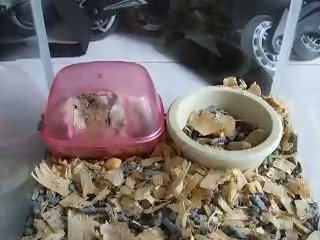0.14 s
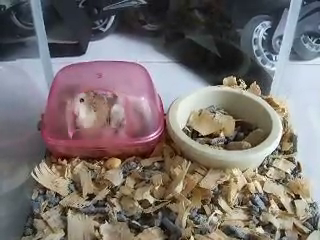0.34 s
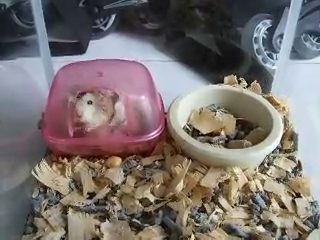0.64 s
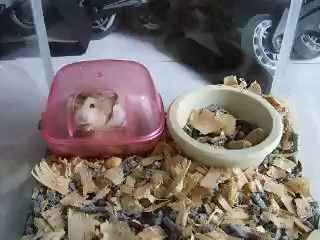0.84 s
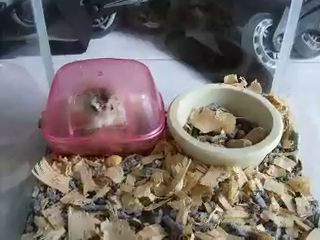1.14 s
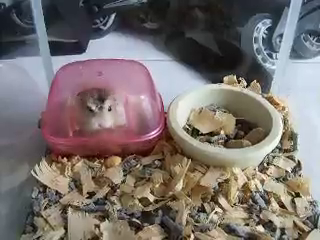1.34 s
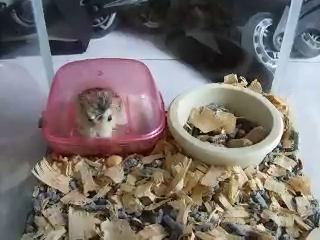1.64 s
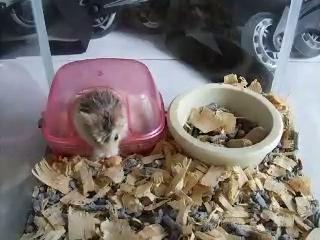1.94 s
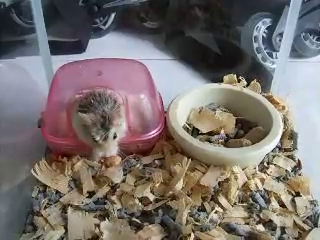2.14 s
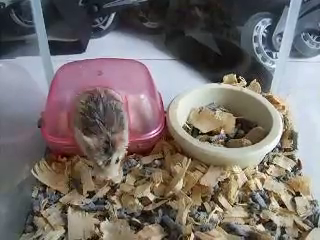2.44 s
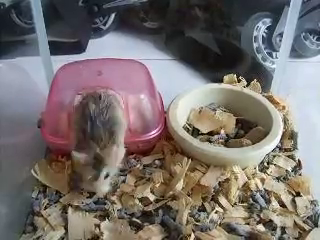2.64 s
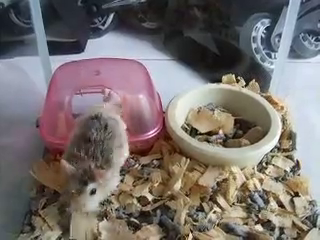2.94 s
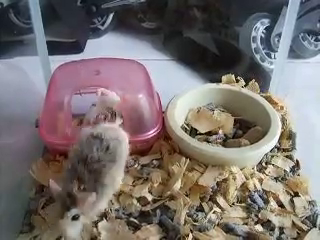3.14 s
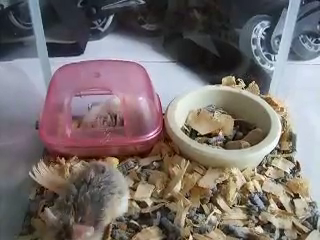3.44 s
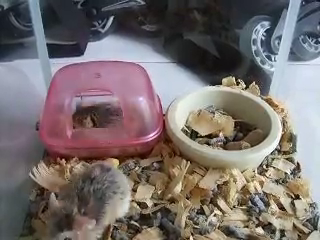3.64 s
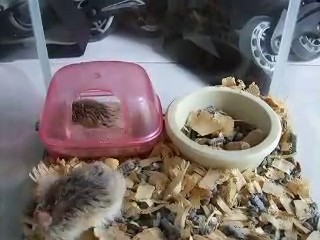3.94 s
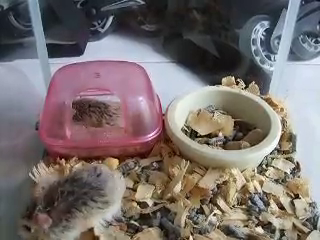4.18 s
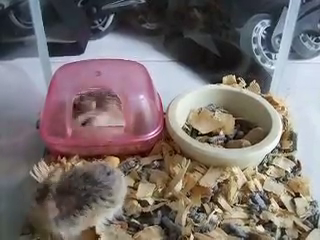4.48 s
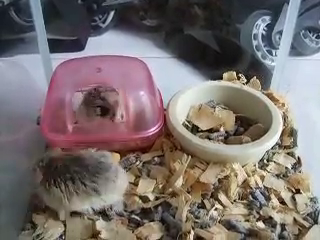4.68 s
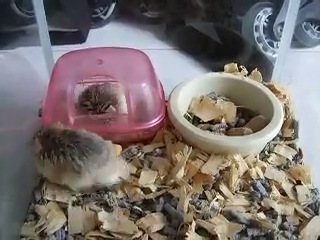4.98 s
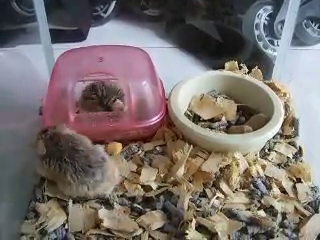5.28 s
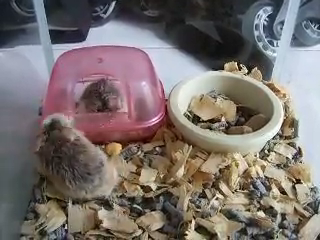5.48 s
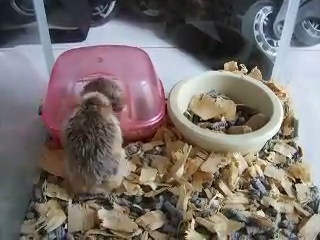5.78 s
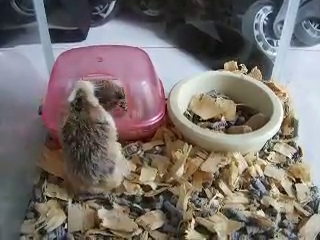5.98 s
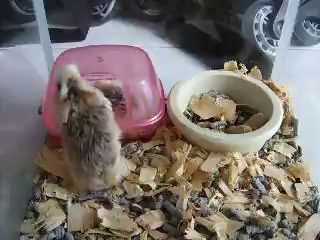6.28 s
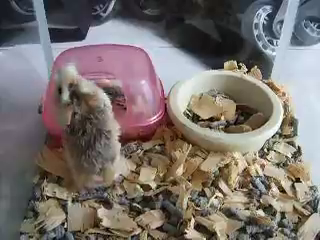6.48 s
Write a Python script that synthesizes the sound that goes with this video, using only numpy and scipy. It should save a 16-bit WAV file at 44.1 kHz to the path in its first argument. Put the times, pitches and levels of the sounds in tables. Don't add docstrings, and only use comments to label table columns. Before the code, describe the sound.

Close to a cage in a hard-floored room, hamsters shuffle through dry shavings, snapping flakes and ticking claws on a plastic hideout. A sharper tick comes early, then the hollow shell knocks once. A steady fan and traffic hum wavers beneath; an engine pulls away faintly outside, and later a thin far horn blares and echoes. The small microphone hisses, with dull highest treble.

```python
import sys
import numpy as np
from scipy import signal
from scipy.fft import rfft, irfft
from scipy.io import wavfile
from scipy.ndimage import uniform_filter1d

SR = 44100
rng = np.random.default_rng(int(sys.argv[2]) if len(sys.argv) > 2 else 0)


def materialize(psi):
    bounded = np.clip(np.atleast_2d(psi).T, -1, 1)
    quanta = np.round(bounded * 32767).astype(np.int16)
    wavfile.write(sys.argv[1], SR, quanta)


def ratio(d):
    e = np.asarray(d, float) / 20
    return 10 ** e


N = 291716


def rms_one(x):
    return x / np.sqrt(np.mean(x ** 2) + 1e-20)


def drift(rate):
    r = np.exp(-80 * np.pi * rate / SR)
    white = rng.standard_normal(N // 40 + 2002)
    slow = signal.lfilter([1], [1, -2 * r, r * r], white)[2000:]
    return np.interp(np.arange(N) / 40, np.arange(len(slow)), rms_one(slow))


def coloured(x, spectrum):
    (low_hz, low_db), (high_hz, high_db) = spectrum[0], spectrum[-1]
    points = [(low_hz / 2, low_db - 30), *spectrum, (high_hz * 2, high_db - 30)]
    point_hz, point_db = np.transpose(points)
    hz = np.maximum(np.fft.rfftfreq(N, 1 / SR), 1)
    return irfft(rfft(x) * ratio(np.interp(np.log(hz), np.log(point_hz), point_db)), N)


def ring(clicks, hz, t60):
    r, w = ratio(-60 / (t60 * SR)), 2 * np.pi * hz / SR
    return signal.lfilter([0, np.sin(w)], [1, -2 * r * np.cos(w), r * r], clicks + 1e-18)


def hollow(hz, width_hz, even=0.063):
    t60 = np.log(1000) / (np.pi * width_hz)
    held_once = ring(rng.standard_normal(N + 9000), hz, t60)
    tone = rms_one(ring(held_once, hz, t60)[9000:])
    height = np.sqrt(uniform_filter1d(tone ** 2, round(3 * SR / hz)) + .05)
    return rms_one(tone / height ** even)


def grains(per_s, spread_db):
    size_db = spread_db * np.minimum(rng.exponential(1, N), 4)
    sizes = ratio(size_db) * rng.choice([-1, 1], N)
    return sizes * (rng.random(N) < per_s / SR)


def efforts(rows, rise_s, fall_s, rest_db):
    t, power = np.arange(0, N + 40, 40) / SR, 0
    for start_s, length_s, db in rows:
        rise = np.clip((t - start_s) / rise_s + 1, 0, 1)
        fall = np.exp(-np.maximum(t - start_s - length_s, 0) / fall_s)
        power = power + (ratio(db) * rise * fall) ** 2
    return 10 * np.log10(ratio(rest_db) ** 2 + np.interp(np.arange(N) / SR, t, power))


# pitch_hz, level_db (per Hz)
RUMBLE = [(15, -53), (34, -42.5), (45, -45.5), (90, -52), (130, -44.5), (190, -48), (300, -51.5),
          (340, -72), (430, -61), (600, -57), (830, -52), (1000, -55), (1300, -76), (1600, -68)]
# pitch_hz, width_hz, level_db
ROOM_RINGS = [(166.4, 7.4, -51), (188.3, 14, -53), (228.4, 17.4, -47.5), (314.3, 26, -55), (368, 30, -60),
              (716, 56, -58), (818, 134, -47), (918, 83, -49.5), (1188, 51, -62.5)]
# time_s, level_db
FAN = [(0, -38), (.42, -48), (.7, -40), (1.6, -43.5), (1.8, -38.5), (2.05, -44), (2.3, -39.5), (2.8, -43),
       (3.0, -41), (4.9, -40), (5.38, -35.5), (5.71, -42), (6.0, -37.5), (6.1, -39), (6.3, -41),
       (6.42, -33.5), (6.52, -37), (6.61, -43)]
# start_s, length_s, level_db
CATCHES = [
    (.6, 0.11, -48.5),
    (3.3, 0.54, -47.5),
    (4.4, 0.056, -45.5),
    (4.82, 0.069, -54.5),
    (5.18, 0.07, -49),
    (5.65, 0.31, -52.5),
]
OVERTONE_DB = -54
CATCH_RISE_S, CATCH_FALL_S = 0.11, 0.053
TRAFFIC_START_DB, TRAFFIC_NEARS_DB, TRAFFIC_NEARS_S = -2.5, 3.0, 3
LOW_WAVER_DB, MID_WAVER_DB, WAVER_PER_S = 0.44, 0.34, 7.5


def room_hum():
    t = np.arange(N) / SR
    fan_db = np.interp(t, *np.transpose(FAN))
    overtone_db = efforts(CATCHES, CATCH_RISE_S, CATCH_FALL_S, OVERTONE_DB)
    bed = 19.84 * coloured(rng.standard_normal(N), RUMBLE)
    bed = bed + sum(ratio(db) * hollow(hz, width) for hz, width, db in ROOM_RINGS)
    low = signal.sosfiltfilt(signal.butter(2, 450, fs=SR, output="sos"), bed)
    mid_db = TRAFFIC_START_DB + TRAFFIC_NEARS_DB * (1 - np.exp(-t / TRAFFIC_NEARS_S))
    wavering_low = low * ratio(LOW_WAVER_DB * drift(WAVER_PER_S))
    wavering_mid = (bed - low) * ratio(mid_db + MID_WAVER_DB * drift(WAVER_PER_S))
    fan = ratio(fan_db - 1.5) * hollow(270.1, 23.9, even=0.46)
    overtone = ratio(overtone_db - 1.5) * hollow(541.3, 21, even=0.13)
    return wavering_low + wavering_mid + fan + overtone


IDLE_HZ, IDLE_DB, PULL_HZ, PULL_DB = 124.2, -46.5, 134.8, -38
PULL_S, PULL_LASTS_S, SPIN_UP_S, GONE_S = .9, .73, 0.45, 0.18


def engine():
    t = np.arange(N) / SR
    hz = PULL_HZ - (PULL_HZ - IDLE_HZ) * np.exp(-np.maximum(t - PULL_S, 0) / SPIN_UP_S)
    idle_db = IDLE_DB - 200 * (t > PULL_S)
    db = efforts([(PULL_S, PULL_LASTS_S, PULL_DB)], 0.025, GONE_S, idle_db)
    return np.sqrt(2) * ratio(db - 1.0 + 0.15 * drift(2.9)) * np.sin(2 * np.pi * np.cumsum(hz) / SR)


# start_s, held_s, level_db (of the lead overtone)
BLASTS = [
    (3.916, 0.049, -41.5),
    (4.07, .06, -50.5),
    (4.2, .05, -65),
    (4.36, 0.071, -59),
]
# order (times the base pitch), level_db
HORN_ORDERS = [(6, -12), (7.93, 0), (8.95, -14)]
HORN_S, HORN_ENDS_S, HORN_START_HZ, HORN_HZ, HORN_SETTLES_S = 3.916, 5.4, 424, 432, .12
BLAST_RISE_S, BLAST_FALL_S = .004, 0.039
STREET_DB, STREET_LOSS_DB_PER_S = -58, 3.5
UPPER_DB, UPPER_LOSS_DB_PER_S, UPPER_RISE_S = -55.5, 6, .1


def horn():
    t = np.arange(N) / SR
    since = np.maximum(t - HORN_S, 0)
    hz = HORN_HZ - (HORN_HZ - HORN_START_HZ) * np.exp(-since / HORN_SETTLES_S)
    street_db = STREET_DB - STREET_LOSS_DB_PER_S * since
    lead_db = efforts(BLASTS, BLAST_RISE_S, BLAST_FALL_S, street_db)
    upper_db = UPPER_DB - UPPER_LOSS_DB_PER_S * since - 6.6 * np.exp(-since / UPPER_RISE_S)
    overtones = [(7.03, lead_db), (6.925, lead_db - 1 - 3 * since), (7.8, upper_db - 4)]
    overtones += [(order, upper_db + order_db) for order, order_db in HORN_ORDERS]
    out, wobble = 0, 1 + .002 * drift(30)
    for order, db in overtones:
        turns = order * np.cumsum(hz * (wobble + .0012 * drift(40))) / SR
        out = out + ratio(db + 2.5 * drift(25)) * np.sin(2 * np.pi * turns)
    onset = np.clip((t - HORN_S) / BLAST_RISE_S + 1, 0, 1)
    return onset * (t < HORN_ENDS_S) * out


# time_s, peak_db
KNOCKS = [
    (2.8356, -26.5),
    (2.8425, -59),
]
# pitch_hz, level_db, t60_s
KNOCK_MODES = [(557, 7, 0.039), (395, -25, 0.02), (695, -3, 0.025)]


def knock():
    clicks = np.zeros(N)
    for s, db in KNOCKS:
        clicks[round(s * SR)] = -ratio(db)
    soft = signal.lfilter([.12], [1, -.88], clicks)
    return sum(ratio(db) * ring(soft, hz, t60) for hz, db, t60 in KNOCK_MODES)


# time_s, peak_db, pitch_hz, brightness_db
CLAW_TICKS = [(.6243, -43, 2910, -5), (0.663, -37, 2940, 10), (1.079, -39.5, 2920, 0),
              (1.3176, -21.5, 2940, -6), (1.737, -37, 2750, 0), (1.819, -37, 2777, 2),
              (2.6276, -36, 2620, -7), (3.281, -39, 2570, 0), (3.5133, -32.5, 2590, -1),
              (3.611, -35, 2700, -5), (3.7514, -34.5, 2640, 8), (5.659, -36, 2610, 12),
              (5.853, -39.5, 2720, 1), (6.013, -32, 2760, 6), (6.0396, -35.5, 3270, 0),
              (6.06, -33, 2920, -11), (6.071, -35, 2580, 3.5), (6.173, -43, 2600, -6),
              (6.225, -38, 2680, 1)]
# time_s, peak_db, pitch_hz, brightness_db
SNAPS = [(.692, -33, 7040, -6), (0.8618, -32.5, 8000, -1), (1.003, -33, 7660, -2), (1.158, -36, 7010, 11),
         (1.3164, -25.5, 5470, -4), (1.863, -29, 6500, 7), (1.8924, -28.5, 4850, 5), (1.911, -36, 4900, -4),
         (2.0535, -31, 5130, -9), (2.07, -34, 5140, -3), (2.093, -34.5, 6910, -9), (2.121, -30.5, 5750, -6),
         (2.1826, -39, 7600, 13), (2.343, -37.5, 7600, -5), (3.2077, -31.5, 7800, -8),
         (3.247, -34.5, 7000, -6), (3.3424, -34, 5960, -5), (3.8317, -38, 7380, 4), (5.6694, -34, 4080, 7),
         (5.687, -43.5, 5200, 6), (5.9117, -44, 6760, 6), (5.9544, -33, 7370, -10), (6.079, -36, 7260, -5),
         (6.2695, -34, 5800, 2)]
TICK_DIES_MS, SNAP_DIES_MS = 3.0, 3.6


def ticks():
    out, age = np.zeros(N + 3000), np.arange(3000) / SR
    rows = [(*row, TICK_DIES_MS) for row in CLAW_TICKS] + [(*row, SNAP_DIES_MS) for row in SNAPS]
    bright = signal.butter(2, 3000, "high", fs=SR, output="sos")
    first_break = 2.53 * (age == 0)
    for s, db, hz, bright_db, dies_ms in rows:
        body, crack = rng.standard_normal((2, 3000))
        burst = np.exp(-age / (dies_ms / 1000)) * (1 - np.exp(-age / 0.00041))
        tone = ring(body * burst + first_break, hz, 12.0 / hz)
        crack = signal.sosfilt(bright, crack * burst + first_break)
        both = tone / np.abs(tone).max() + ratio(bright_db) * crack / np.abs(crack).max()
        i = round((s + 0.00088) * SR)
        out[i:i + 3000] += ratio(db - 1.0) * both
    return signal.sosfilt(signal.butter(2, 1100, "high", fs=SR, output="sos"), out[:N])


# pitch_hz, level_db (per Hz)
SHAVINGS = [(3200, -4), (4200, -6), (5000, -6.5), (6000, -5), (7000, -4), (7800, -2.5), (8500, -14.5),
            (9000, -12)]
# pitch_hz, level_db
FLAKES = [(4300, -6.5), (4900, -8.5), (5450, -4), (5950, -2), (6500, -3.5), (7100, -0.5), (7500, -3),
          (7900, -4.5), (8150, -4.5)]
# start_s, level_db
STEPS = [(.69, -43), (.85, -47), (1.077, -44), (1.16, -49), (1.374, -42), (1.61, -59), (1.738, -45.5),
         (1.907, -41.5), (1.865, -50), (2.055, -40), (2.115, -44.5), (2.19, -40.5), (2.42, -44.5),
         (3.21, -43), (3.505, -43), (3.618, -34), (.28, -52), (4.065, -47), (4.435, -46), (4.505, -44.5),
         (4.605, -47), (4.765, -46), (5.68, -40), (5.845, -48), (5.905, -38), (6.055, -45.5), (6.215, -49),
         (6.56, -43.5)]
STEP_S, STEP_RISE_S, STEP_FALL_S = .014, 0.017, 0.018
# start_s, length_s, level_db
SHUFFLES = [(.62, .36, -45.5), (1.8, 0.079, -47), (2.095, 0.017, -48), (2.34, 0.13, -49.5),
            (2.5, .68, -51.5), (3.26, 0.12, -41.5), (3.44, 0.059, -41.5), (3.56, 0.058, -45.5),
            (4.86, 0.05, -56), (3.63, 0.085, -45), (4.39, 0.083, -50.5), (4.59, 0.082, -52),
            (4.72, 0.058, -46), (4.98, 0.045, -52.5), (5.09, 0.057, -47), (5.65, 0.045, -43.5),
            (5.74, 0.047, -47.5), (5.92, 0.296, -47.5), (6.54, 0.079, -50.5)]
SHUFFLE_RISE_S, SHUFFLE_FALL_S = 0.035, 0.046
STIRRING_DB = -52


def shavings():
    shuffle_db = efforts(SHUFFLES, SHUFFLE_RISE_S, SHUFFLE_FALL_S, STIRRING_DB)
    steps = [(s, STEP_S, db) for s, db in STEPS]
    level_db = efforts(steps, STEP_RISE_S, STEP_FALL_S, shuffle_db)
    clumps = ratio(3.7 * drift(44))
    crackle = rms_one(coloured(grains(9000 * clumps, 1.2), SHAVINGS))
    flakes = rms_one(sum(ratio(db) * ring(grains(400 * clumps, 1.8), hz, 0.01) for hz, db in FLAKES))
    return ratio(np.minimum(level_db, -38) - 3.0) * (0.42 * crackle + 0.63 * flakes)


# pitch_hz, level_db, t60_s
HIDEOUT = [(2246, -4, 0.017), (2566, -4, 0.038), (2750, 0.5, 0.023), (2942, -2.5, 0.028),
           (3320, -3.5, 0.027), (3870, -5, 0.025)]
# start_s, length_s, level_db
STROKES = [(.615, 0.29, -55), (1.322, .01, -59), (1.37, 0.026, -61), (1.735, 0.02, -55), (1.81, .06, -59),
           (2.04, 0.019, -50), (2.7, .25, -55.5), (3.15, 0.15, -56), (3.34, 0.069, -48), (3.46, 0.044, -47),
           (3.55, .05, -53), (3.612, 0.023, -48), (3.65, .12, -51), (3.92, 0.37, -55), (4.39, 0.19, -51.5),
           (4.62, 0.032, -51), (4.75, 0.07, -51.5), (5.04, 0.086, -52), (5.65, 0.014, -39),
           (5.835, 0.023, -52), (5.89, 0.055, -51), (6.05, 0.024, -48.5), (6.12, 0.11, -52.5),
           (6.57, .04, -52)]
STROKE_RISE_S, STROKE_FALL_S = 0.0081, 0.036
LEANING_DB = -60


def claws():
    level_db = efforts(STROKES, STROKE_RISE_S, STROKE_FALL_S, LEANING_DB)
    scratch = 0
    for hz, db, t60 in HIDEOUT:
        slips = grains(600 * ratio(2.4 * drift(22)), 4.5)
        scratch = scratch + ratio(db) * ring(slips, hz, t60)
    return ratio(np.minimum(level_db, -46) - 2.1) * rms_one(scratch)


def scene():
    street_and_room = room_hum() + engine() + horn()
    cage = knock() + ticks() + shavings() + claws()
    return (street_and_room + cage)[None]


# pitch_hz, level_db (per Hz)
HISS = [(1200, 4.5), (1500, -8.5), (1900, -8.5), (2400, -10.5), (2700, -7.5), (4000, -12.5), (6000, -11.5),
        (7600, -16.5), (8100, -19), (8350, -25.5), (8700, -39), (9080, -40.5)]
HISS_DB = -50


def microphone_hiss():
    return ratio(HISS_DB) * rms_one(coloured(rng.standard_normal(N), HISS))


def roll_off(x):
    return signal.sosfilt(signal.butter(12, 9080, fs=SR, output="sos"), x)


def record(dry):
    dull = signal.sosfilt(signal.butter(16, 8150, fs=SR, output="sos"), dry)
    top = signal.cheby2(20, 60, 9330, fs=SR, output="sos")
    mix = signal.sosfilt(top, dull + microphone_hiss()) - .0024
    return roll_off(mix)


dry = scene()
out = record(dry)
materialize(out)
```